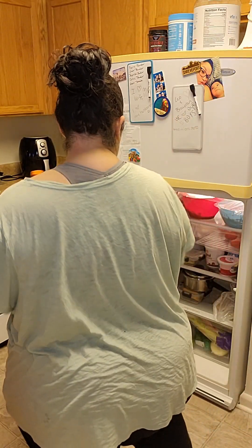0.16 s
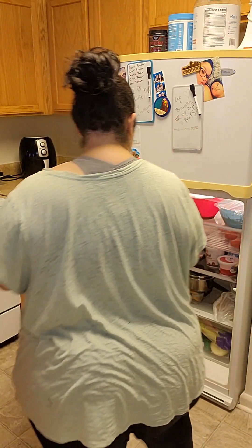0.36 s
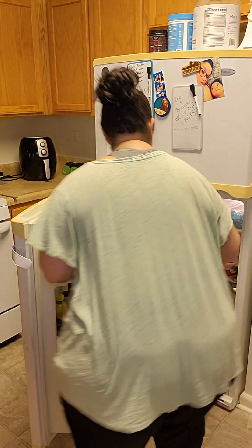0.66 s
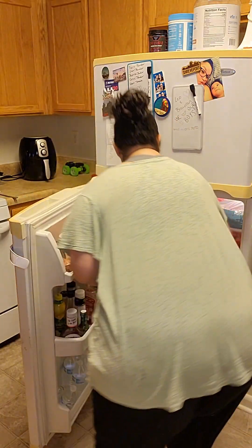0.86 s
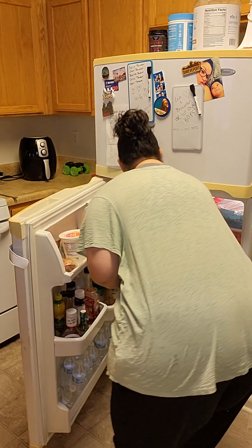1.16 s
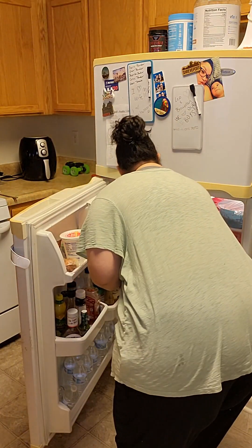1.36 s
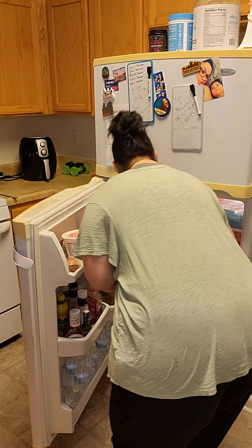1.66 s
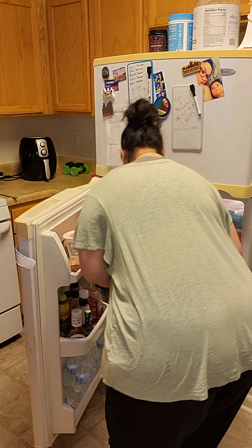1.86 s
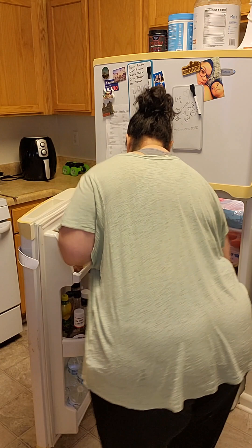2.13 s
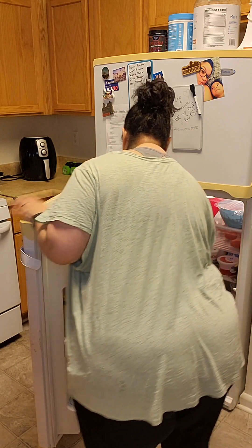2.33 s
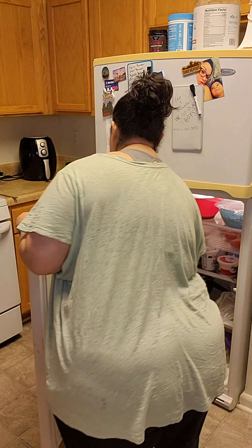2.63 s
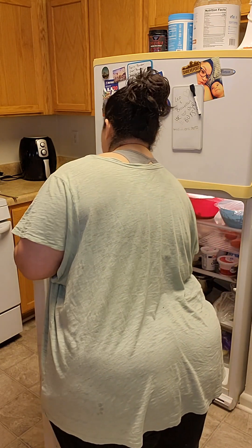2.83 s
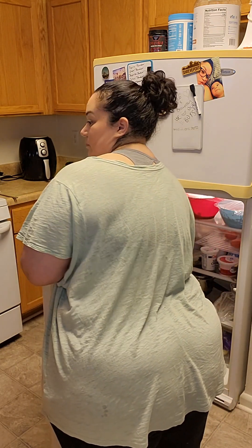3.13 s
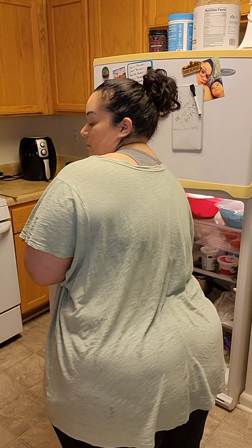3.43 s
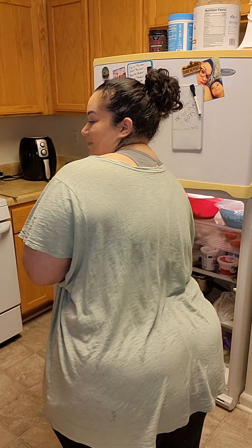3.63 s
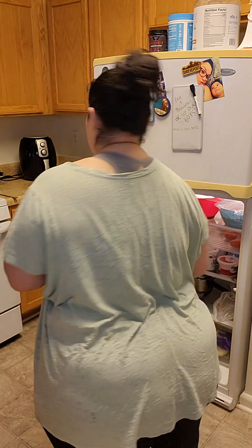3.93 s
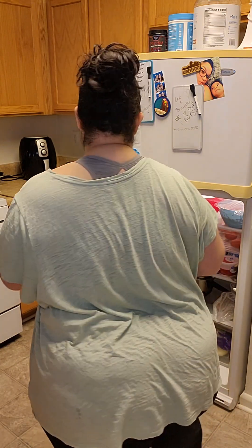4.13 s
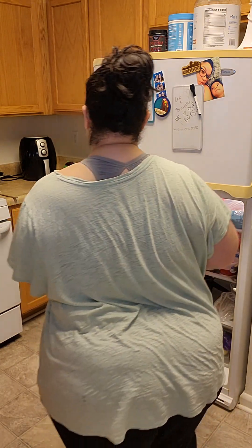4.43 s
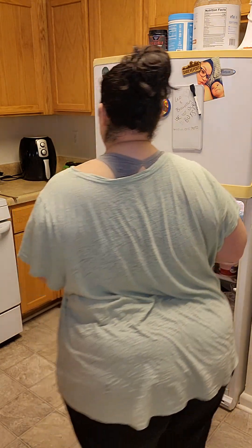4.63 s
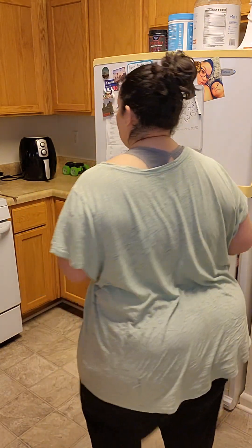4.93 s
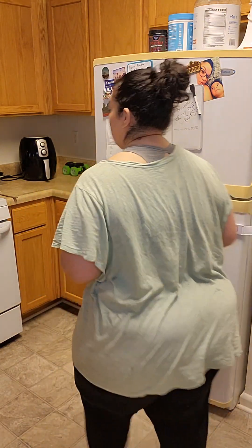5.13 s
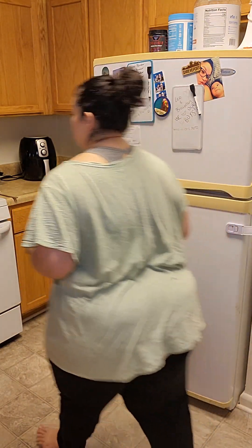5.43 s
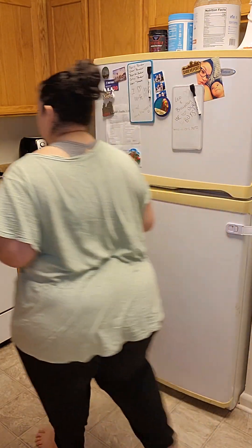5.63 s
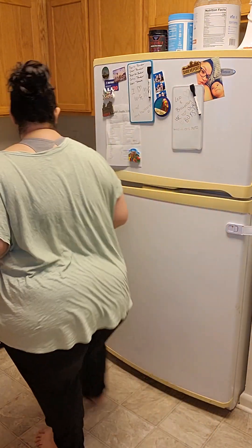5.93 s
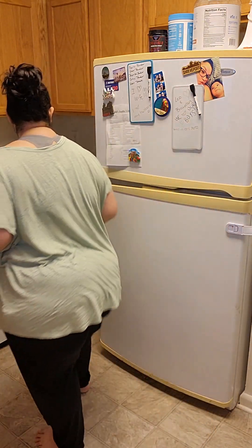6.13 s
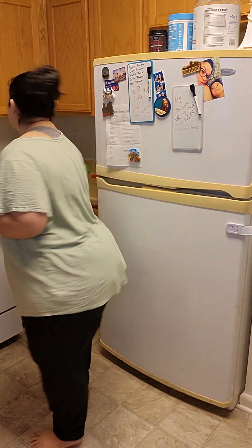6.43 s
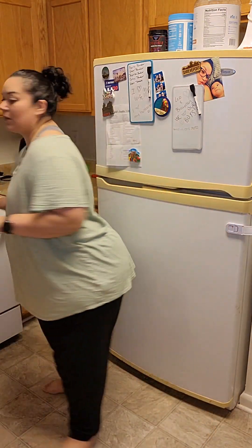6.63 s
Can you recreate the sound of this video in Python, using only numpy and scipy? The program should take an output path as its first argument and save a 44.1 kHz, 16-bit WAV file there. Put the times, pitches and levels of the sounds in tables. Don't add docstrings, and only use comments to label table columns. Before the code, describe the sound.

A humming open refrigerator, things set down with clacks, a drawer dragged and banged shut with glass clinks, then a deep door thump.

```python
import sys
import numpy as np
from scipy import signal
from scipy.fft import rfft, irfft, next_fast_len
from scipy.io import wavfile
from scipy.ndimage import map_coordinates

SR = 44100
rng = np.random.default_rng(int(sys.argv[2]) if len(sys.argv) > 2 else 0)


def ratio(d):
    e = np.asarray(d, float) / 20
    return 10 ** e


def inscribe(sig):
    pcm = np.round(np.clip(np.atleast_2d(sig).T, -1, 1) * 32767)
    wavfile.write(sys.argv[1], SR, pcm.astype(np.int16))


N = 298777

# pitch_hz, width_hz, level_db
CABINET = [(62.04, 16, -10), (103.2, 16, -2), (142, 38, -1.5), (195.4, 30, 1.5), (253, 47, -11)]
# pitch_hz, width_hz, level_db
SHELF = [(322, 54, -0.5), (420.4, 30, 5.5), (485.7, 110, 0.5), (558, 95, 3), (623, 130, 1), (914, 98, -2),
         (976, 90, -3.5), (1197, 200, -5.5), (1377, 200, -12), (1805, 160, -10)]
# pitch_hz, level_db (per Hz)
CRACK = [(330, -31.5), (710, -7.5), (1200, -4), (2600, -8), (2880, -9), (3340, -10), (6000, -24),
         (7800, -44.5), (13200, -120)]
# pitch_hz, level_db (per Hz)
SIZZLE = [(2650, -31), (4500, -7.5), (5880, -11), (6690, -9.5), (6950, -7.5), (8700, -8), (9380, -12),
          (9840, -11), (10300, -14.5), (15100, -12), (16200, -22.5)]


def unit(x):
    power = np.mean(np.abs(x) ** 2, -1, keepdims=True)
    return x / np.sqrt(power + 1e-20)


def along(points, hz):
    f, v = np.transpose(points)
    return np.interp(np.log(hz + 1), np.log(f + 1), v)


def curves(rows):
    s, *cols = np.transpose(rows)
    return [np.interp(np.arange(N) / SR, s, c) for c in cols]


def wobble(rate):
    knots = rng.standard_normal(int(N * rate / SR) + 4)
    return map_coordinates(knots, [np.arange(N) * rate / SR])


def filtered(x, response):
    m = next_fast_len(x.shape[-1] + 8192)
    spectrum = rfft(x, m) * response(np.fft.rfftfreq(m, 1 / SR))
    return irfft(spectrum, m)[..., :x.shape[-1]]


def body(peaks):
    lowest_hz = peaks[0][0] * 0.21

    def response(f):
        ring = 0
        for k, (hz, width, db) in enumerate(peaks):
            resonance = 1j * f * width / (hz * hz - f * f + 1j * f * width)
            ring = ring + (-1) ** k * ratio(db) * resonance
        return ring * (1j * f / (lowest_hz + 1j * f)) ** 2
    return response


def colour(spectrum):
    return lambda hz: ratio(along(spectrum, hz))


def spread(pair):
    # pitch_hz, likeness (1 = same)
    likeness = [(60, 0.91), (110, 1), (200, 0.028), (380, 1), (700, 0.14), (1290, -0.08), (2380, 0.019),
                (4400, 0.02), (8120, 0.19), (15000, 0.27)]

    def mid_side(hz):
        angle = np.arccos(np.clip(along(likeness, hz), -1, 1)) / 2
        angle = angle * hz ** 2 / (hz ** 2 + 70 ** 2)
        return np.array([np.cos(angle), np.sin(angle)])
    mid, side = filtered(pair, mid_side)
    return np.array([mid + side, mid - side])


def kitchen(x, s, direct_db, off_axis=1):
    # pitch_hz, t60_s
    echo = [(60, 1), (160, 0.52), (420, 0.69), (1100, 0.63), (2900, 0.61), (7700, 0.58), (14000, 0.37)]
    # time_s, left_lag (samples)
    bearing = [(0, -3.5), (1.4, -1), (2.4, -18), (3.0, -16), (3.3, -5.5), (3.5, -6), (4.2, 11.5), (5.2, 7),
               (6.7, 4.5)]
    hz, t, z = signal.stft(rng.standard_normal((2, SR)), SR, nperseg=256)
    fading = ratio(-60 * t / along(echo, hz)[:, None])
    tail = signal.istft(z * fading, SR, nperseg=256)[1][:, :SR]
    tail = unit(spread(tail)) / np.sqrt(SR)
    lag = off_axis * np.interp(s, *np.transpose(bearing)) * np.array([[.5], [-.5]])
    tail[:, :40] = ratio(direct_db) * np.sinc(np.arange(40) - 16 - lag)
    return signal.fftconvolve(x[None], tail, axes=1)


def add(out, sound, s):
    part = out[:, round(s * SR):][:, :sound.shape[1]]
    part += sound[:, :part.shape[1]]


def machine():
    # pitch_hz, level_db (per Hz)
    rumble = [(15, -54), (25, -31.5), (41, -16), (64, -3), (88, -12.5), (108, -11.5), (176, -8.5),
              (326, -14.5), (412, -15), (459, -16.5), (617, -17), (1240, -31), (4000, -59), (5200, -88.5),
              (8800, -120)]
    # pitch_hz, level_db
    tones = [(59.5, -0.5), (119, -7.5), (240, -16)]
    # time_s, level_db
    shade = [(0, 0), (1.1, 1), (2.1, 0), (4.0, 1.5), (4.6, -5.5), (5.1, 2), (5.9, -2.5), (6.2, -6),
             (6.45, 0), (6.77, -4)]
    hum_level_db, fan_level_db = -58, -57
    hum_shaded, fan_shaded = 1.2, 0.39
    swing_s, swing_wide_s, swing_db = 4.95, 0.21, 4.5
    shut_s, muffle_db = 4.7, -1

    shade_db, = curves(shade)
    t = np.arange(N) / SR
    swing = np.exp(-((t - swing_s) / swing_wide_s) ** 2)
    hum_db = hum_level_db + hum_shaded * shade_db + swing_db * swing
    hum = np.zeros(N)
    for hz, db in tones:
        unsteady_db = 1.5 * np.sqrt(hz / 60) * wobble(9)
        hum += ratio(db + unsteady_db) * np.sin(2 * np.pi * hz * t + 0.97 * wobble(2.5))
    fan = unit(filtered(spread(rng.standard_normal((2, N))), colour(rumble)))
    fan_db = fan_level_db + fan_shaded * shade_db + muffle_db * (t > shut_s) + 1.0 + 1.2 * wobble(4.9)
    return ratio(hum_db + 3.0) * hum + ratio(fan_db) * fan


def bowl():
    # pitch_hz, level_db, t60_s
    tones = [(328, -53, 2.8), (640, -51.5, 0.19)]
    t = np.arange(N) / SR
    out = np.zeros(N)
    for hz, db, t60 in tones:
        level_db = db - 60 * t / t60 + 1.5 * wobble(12)
        out += ratio(level_db) * np.sin(2 * np.pi * hz * t + 0.65 * wobble(15))
    return out


def rustle():
    # pitch_hz, level_db (per Hz)
    cloth = [(880, -39.5), (1500, 0), (2040, -2), (2320, -8.5), (4920, -2), (6690, -4), (7920, 1.5),
             (11400, -10.5), (15100, -8), (16000, -15)]
    # pitch_hz, level_db (per Hz)
    haze = [(1180, -29.5), (2000, -6.5), (2280, -9), (2440, -15), (5830, -12), (8550, -8.5), (13900, -20),
            (16000, -15.5)]
    # peak_s, level_db, swell_s, fade_s (swell and fade over 20 dB)
    strokes = [(0, -67.5, .1, .4), (.135, -59.5, .05, .08), (.17, -68.5, .03, 0.55), (.42, -71, .03, 0.47),
               (.9, -70.5, 0.35, 0.56), (1.12, -59.5, 0.171, 0.53), (1.97, -75.5, 0.04, .4),
               (2.249, -81.5, .5, 0.232), (4.036, -54.5, 0.018, 0.082), (4.157, -51.5, .012, 0.098),
               (4.314, -60, .2, 0.16), (4.9, -63.5, .12, 0.36), (4.97, -62, .1, 0.24),
               (5.042, -64.5, .08, .6), (5.6, -69.5, .3, .3), (5.684, -55, 0.0248, 0.106),
               (5.75, -67.5, .05, 0.46), (5.916, -67.5, 0.16, .09), (6.094, -74.5, 0.31, 0.64),
               (6.316, -73, 0.141, .4), (6.527, -62, 0.13, 0.19)]
    haze_db = -82.5

    def hiss(spectrum):
        return filtered(spread(rng.standard_normal((2, N))), colour(spectrum))
    t = np.arange(N) / SR
    power = np.zeros(N)
    for s, db, swell, fade in strokes:
        power += ratio(2 * db - 40 * np.maximum((s - t) / swell, (t - s) / fade))
    grain = ratio(1.7 * wobble(25) + 1.1 * wobble(330))
    brushing = np.sqrt(power) * unit(grain * hiss(cloth))
    return brushing + ratio(haze_db + 1.0) * unit(hiss(haze))


def blow(t, rise, length):
    z = unit(rfft(rng.standard_normal(len(t)) * (1 - np.exp(-t / rise)) * np.exp(-t / length)))
    even = irfft(z / (.3 + np.abs(z)), len(t))
    return even * np.exp(-(t / (3 * length)) ** 2)


def contacts():
    # start_s, crack_db, weight_db (knock and thump), hardness_db (sizzle), both over the crack
    touches = (3.3, -8.5, [(0.0094, -57.5, 4, -14), (0.1172, -59, 1, -4), (0.4174, -58, 6, -6),
               (4.0315, -61.5, 12, 1), (4.1538, -50, -4.5, -4), (5.4794, -51.5, 9, -2.5),
               (5.683, -53, -7, -8.5), (5.9088, -71.5, 10.5, -1.5), (6.0887, -75, 12, 5)])
    set_down = (2.4, -11, [(1.1379, -36.5, 3, -10), (1.1599, -29.5, 0, -12), (1.2198, -35, 1, -19)])
    clacks = (-10, -10.5, [(1.3649, -22.5, -9, -6.5), (3.1141, -32.5, -10.5, -9), (3.2695, -16.5, -7, -14),
              (3.3475, -13.5, -9.5, -9.5), (3.3678, -12, -5, -18), (3.3998, -24.5, 4, -19.5)])
    bumps = (-8.5, -11, [(2.359, -25, 12, -12), (2.37, -27, 5.5, -19), (2.6511, -43, 6, -4),
             (2.6869, -26.5, -0.5, -18.5), (2.7998, -39, 10.5, -13), (2.9123, -30, -3.5, -6.5),
             (3.0391, -42, -2, -4), (3.6506, -34, 4, -14), (3.8083, -47.5, 2, -17)])
    seal = (1, -19, [(5.1703, -23, -18, -25), (5.2127, -21.5, -1.5, -4)])

    def edge(hz):
        return 1 / (1 + (hz / 11500) ** 12)

    def low_sizzle(hz):
        return colour(SIZZLE)(hz) * edge(hz)

    def top_sizzle(hz):
        return colour(SIZZLE)(hz) * (1 - edge(hz))
    paths = body(CABINET), body(SHELF), colour(CRACK), low_sizzle, top_sizzle
    out, t = np.zeros((2, N)), np.arange(SR // 4) / SR
    for thump_db, top_db, rows in (set_down, clacks, bumps, seal, touches):
        for s, db, weight_db, hard_db in rows:
            force = blow(t, rise=.0004, length=.013)
            parts = unit(np.array([filtered(force, path) for path in paths]))
            levels_db = [weight_db + thump_db - 3.0, weight_db - 0.5, -1.5, hard_db, hard_db + top_db]
            knock = (ratio(levels_db)[:, None] * parts).sum(0)
            add(out, kitchen(ratio(db - 13.5) * knock, s, direct_db=-4.0), s)
    return out


def whistles():
    # start_s, end_s, pitch_hz, width_hz, level_db
    whines = [(.1, .35, 5000, 260, -79), (.45, .72, 5040, 260, -83), (.25, .5, 4100, 230, -83),
              (.6, 1.1, 3900, 170, -87), (.9, 1.1, 5100, 260, -84), (1.0, 1.13, 2450, 250, -82)]
    t = np.arange(N) / SR
    out = np.zeros((2, N))
    for start, end, hz, width, db in whines:
        swell = np.sqrt(np.clip((t - start + 0.076) * (end - t), 0, None)) * 2 / (end - start)
        noise = spread(rng.standard_normal((2, N)))
        tone = unit(filtered(noise, lambda f: np.exp(-((f - hz) / width) ** 2)))
        out += ratio(db) * swell * tone
    return out


def drawer():
    # start_s, knock_db, lasts_s, thump_db, scrape_db (both over knock)
    shoves = [(1.148, -27, .04, -3.5, -10.5), (1.215, -34, 0.023, -3, -18.5), (2.362, -21.5, .065, -3, -13),
              (2.458, -24, 0.13, -7.5, -12.5), (2.688, -27, 0.053, -10.5, -10), (2.774, -29, .09, -1, -14),
              (2.9, -32, 0.058, -2.5, -7.5), (3.113, -48, 0.017, -8.5, 4.5), (3.337, -26, .015, 1.5, 0),
              (3.356, -11.5, 0.059, -9, -10.5), (3.627, -29, .08, -5, -22), (3.809, -41.5, 0.023, -9, -23),
              (4.875, -60.5, .08, 1.5, 4.5), (5.032, -53, 0.12, 2.5, 4), (5.211, -28.5, .015, 5.5, -1),
              (5.253, -29, 0.017, -4.5, -12)]
    grip_s, settle_db_per_s = .007, 170.5
    scrape_settles, sizzle_db = 1.5, -7
    ticks_per_s, tick_db, tick_scatter_db = 260, 17, 7

    paths = body(SHELF), body(CABINET), colour(CRACK), colour(SIZZLE)
    out, t = np.zeros((2, N)), np.arange(SR // 2) / SR
    for s, db, lasts, thump_db, scrape_db in shoves:
        speeds = [1, 1, scrape_settles, scrape_settles]
        fall_db = -settle_db_per_s * np.outer(speeds, np.maximum(0, t - lasts))
        over_db = np.array([[0], [thump_db], [scrape_db - 4.5], [scrape_db - 5.5 + sizzle_db]])
        levels_db = db - 6.5 + fall_db + over_db
        slips = rng.standard_normal(len(t)) * ratio(4.5 * wobble(60)[:len(t)])
        taps = rng.random(len(t)) < ticks_per_s / SR
        slips += taps * ratio(tick_db + tick_scatter_db * rng.uniform(-0.038, 1, len(t)))
        parts = unit(np.array([filtered(slips, path) for path in paths]))
        grip = 1 - np.exp(-t / grip_s)
        add(out, kitchen(grip * (ratio(levels_db) * parts).sum(0), s, direct_db=0.5), s)
    return out


def clinks():
    # (pitch_hz, level_db, t60_s)
    tub = ([1.366], -30, -6, 2, 0.0014, [(544, 3, 0.05), (794, -4, 0.1), (1097, -11, .08), (5100, -6, .02),
           (8200, -3, .03), (3480, 8, 0.014), (3650, 9, 0.016), (3800, 9, 0.016), (3950, 6.5, 0.014)])
    crisper = ([2.362, 2.48, 2.689], -23.5, -2, 1.6, .006, [(190, 0, .12), (345, -2.5, .1), (412, 0, .14),
               (467, -1, 0.11)])
    runner = ([2.805, 2.895], -22, 2.5, .8, 0.017, [(207, 3.5, 0.2), (142, -8, .12), (330, -7, 0.11),
              (80, -6, .15)])
    jar = ([3.349], -18.5, 6, .4, .002, [(6440, 3, 0.062), (9600, -4.5, .06), (10400, -7, .03)])
    drawer_bin = ([3.356, 3.39], -17, 0, 1.5, .006, [(140, -3, .1), (205, -3, .12), (412, 0, .12),
                  (540, -4, .08), (705, 1, .12), (890, -4, .08), (1150, -8, .07)])
    bottle = ([3.412], -26.5, 2.6, 1.3, .003, [(4030, 2, .14), (3900, 0, 0.12), (4283, -4.5, .08)])
    lid = ([5.171], -26, -5, 2.5, .001, [(1763, 2, 0.07), (2590, -1, 0.04), (1050, -1, 0.04),
           (800, -8, .05), (1400, -2, .03), (2150, -2, .03)])
    door = ([5.2125, 5.272], -10.5, 8, .3, 0.004, [(35, -9, 0.1), (60, -11, 0.1), (89.2, -4, 0.11),
            (123.4, 1, 0.09), (165.4, -5, 0.07), (530, -10, 0.037)])
    out, t = np.zeros((2, N)), np.arange(SR // 3) / SR
    for times, db, direct_db, rough, rise, modes in (tub, crisper, runner, jar, drawer_bin, bottle, lid, door):
        for k, s in enumerate(times):
            ring = np.zeros(len(t))
            for hz, level, t60 in modes:
                shake = rough * wobble(hz / 30)[:len(t)] * np.minimum(1, t * hz / 4)
                ring += ratio(db + level - 60 * t / t60) * np.sin(2 * np.pi * hz * t + shake)
            ring *= 1 - np.exp(-t / rise)
            weaker_db = -4 * k
            add(out, kitchen(ring, s, direct_db, off_axis=0.12) * ratio(weaker_db - direct_db), s)
    return out


def scene():
    return machine() + bowl() + rustle() + contacts() + whistles() + drawer() + clinks()


def roll_off(x):
    return signal.sosfilt(signal.butter(12, 16800, fs=SR, output="sos"), x)


def record(dry):
    # pitch_hz, level_db
    capsule = [(10000, 0.5), (13500, 2), (16000, 1.5)]
    # pitch_hz, left_minus_right_db
    tilt = [(60, 2.5), (150, -1), (380, 1), (950, 1), (2380, 1.5), (5980, -2), (15000, -3)]

    def port_response(hz):
        tilt_db = along(tilt, hz) * np.minimum(1, hz / 90)
        return ratio(along(capsule, hz) + np.outer([.5, -.5], tilt_db))
    ports = filtered(dry, port_response)
    ports = ports / (1 + np.abs(ports / .97) ** 8) ** (1 / 8)
    ports = filtered(ports, lambda hz: 1 / (1 + (hz / 16350) ** 120))
    return roll_off(ports)


dry = scene()
out = record(dry)
inscribe(out)
```